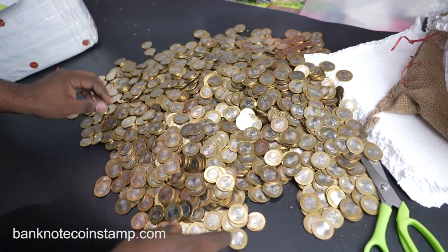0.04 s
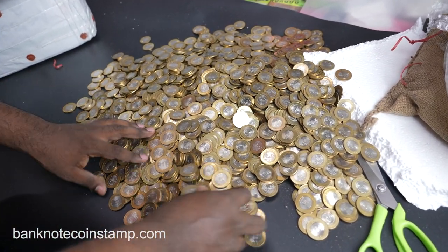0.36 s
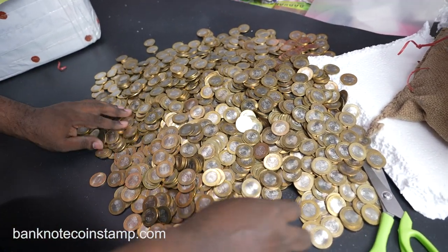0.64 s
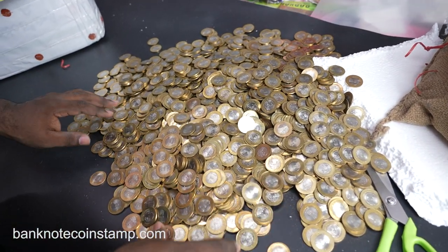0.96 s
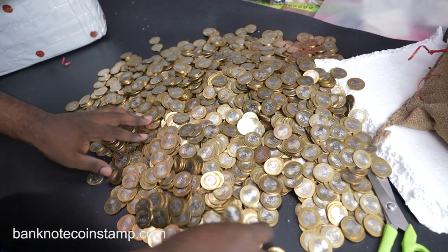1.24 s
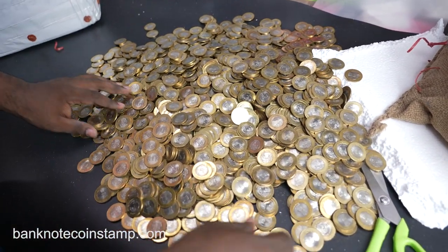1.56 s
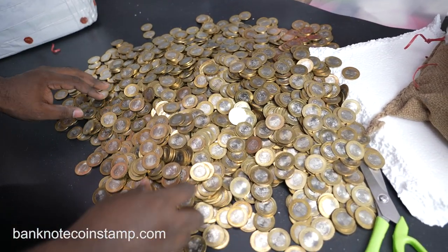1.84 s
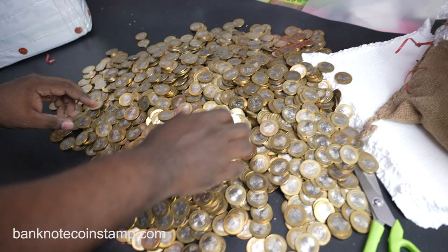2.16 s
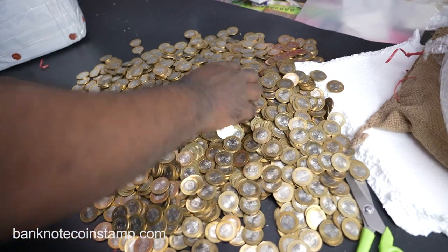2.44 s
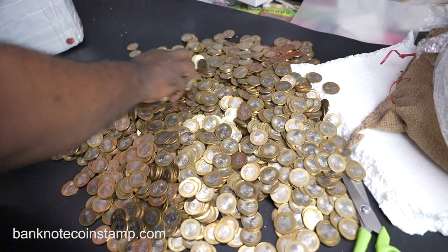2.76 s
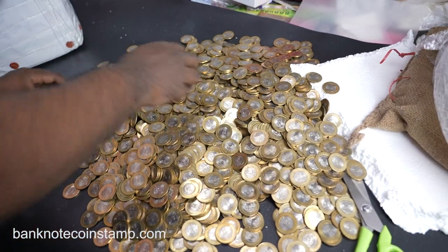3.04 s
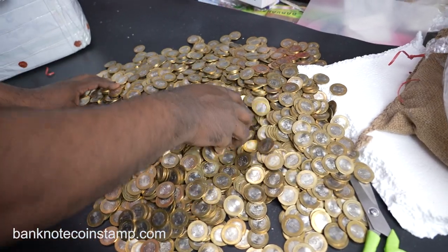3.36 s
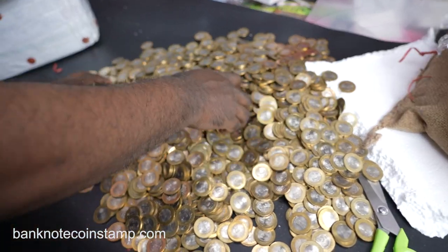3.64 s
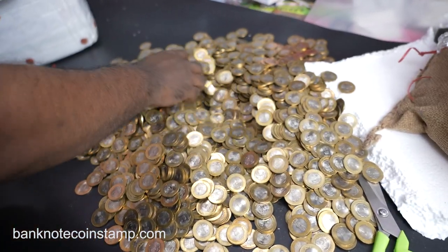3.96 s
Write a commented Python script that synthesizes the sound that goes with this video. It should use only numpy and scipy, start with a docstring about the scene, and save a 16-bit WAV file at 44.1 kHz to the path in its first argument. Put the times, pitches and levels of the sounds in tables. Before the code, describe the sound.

A large pile of metal coins jingles and clatters, stirred by hand in several strokes.

```python
"""In a small room, close by, hands rake through a big heap of coins on a covered table: two light pushes
at the edge, a few stray clinks, then two deep strokes through the middle. Thousands of tiny collisions
click, ring the coins and clatter in the heap and the table; single coins slip and clack on top.
The room echoes briefly and hums faintly."""
import sys
import numpy as np
from scipy import signal
from scipy.fft import rfft, irfft, next_fast_len
from scipy.io import wavfile
from scipy.ndimage import uniform_filter1d, map_coordinates

SR = 44100
rng = np.random.default_rng(int(sys.argv[2]) if len(sys.argv) > 2 else 0)


def wav_record(signal):
    """Record a signal, one row per channel, as 16-bit PCM in the file named by sys.argv[1]."""
    frames = np.transpose(np.atleast_2d(signal))
    bounded = np.clip(frames, -1, 1)
    # unit amplitude maps onto the largest positive 16-bit level
    quanta = np.round(bounded * 32767).astype(np.int16)
    wavfile.write(sys.argv[1], SR, quanta)


N = 176400

# The room's hum. Each row: pitch in Hz, level in dB before the swell is added.
HUM_TONES = [(100, -70.5), (352, -70)]
# The hum swells and ebbs. Each row: time in seconds, gain in dB.
HUM_GAIN = [(.3, -10), (.95, 0.5), (1.33, -2), (1.65, 5), (2.5, -1.5), (4, 3)]
# The room's echo. Each row: frequency in Hz, fade time in seconds (t60, the time to fall by 60 dB).
ECHO_TIMES = [(200, 0.32), (2000, 0.23), (6000, 0.23), (14000, 0.21)]

# Tone colours. Each row: frequency in Hz, relative strength in dB.
AIR_COLOUR = [(15, -66), (25, -29), (64, -25), (90, -6), (176, -9.5), (243, -7.5), (278, -10.5),
              (344, -1.5), (450, -7.5), (529, -10.5), (588, -9), (637, -9.5), (691, -12.5), (1120, -7.5),
              (1240, -12), (3180, -24), (8000, -43), (15000, -65.5)]  # soft room noise
WOOD_COLOUR = [(25, -70), (60, -25), (130, -17.5), (200, 4), (300, -5.5), (400, 2.5), (580, -1.5), (850, 2),
               (1200, -11), (2500, -37)]  # the table's low rattle
CLATTER_COLOUR = [(25, -84), (100, -62), (400, -33.5), (850, -9.5), (1050, 0.5), (1300, -5.5), (1600, 1.5),
                  (2100, -2), (2600, -7.5), (3500, -2.5), (8000, -39)]  # the body of the heap
RASP_COLOUR = [(30, -100), (1200, -25), (2100, -4.5), (2600, -4), (3400, 1), (4200, -7.5), (5500, -6),
               (9000, -45.5)]  # coins sliding
CLICK_COLOUR = [(30, -100), (1500, -34), (3000, -20.5), (4000, 0), (5200, 3), (6500, 3), (8000, 1),
                (9500, -2), (11000, -19), (16000, -47)]  # tiny collisions
FIZZ_COLOUR = [(30, -100), (5000, -31), (8500, 0), (10000, 7), (11500, 1.5), (13000, 4.5), (14300, -3),
               (15000, -8), (16000, -21)]  # their top treble
LANDING_COLOUR = [(30, -90), (200, -62), (1200, -19.5), (2500, -9.5), (4500, -3.5), (7000, -6.5),
                  (9000, -2), (11000, -4), (14000, -15), (16000, -12)]  # the click of one coin landing
TICK_COLOUR = [(30, -100), (3000, -32), (7000, 8.5), (9500, 5), (12500, 2), (14500, -1.5), (16000, -18)]  # the first instant of a hard contact

# Levels in the tables below are relative: the functions add further gains to most layers.
# One list per hand stroke. Each row: time in seconds, then levels in dB of clicks, clatter, fizz, rasp.
HAND_STROKES = [
    [(0.18, -88, -77, -82, -63.5), (0.21, -60, -77, -83, -75), (0.23, -63.5, -73, -69, -64),
     (0.282, -42.5, -54, -55, -48), (0.364, -53, -55, -70, -63), (0.38, -41, -47.5, -52, -44),
     (0.468, -36.5, -40.5, -44, -39), (0.492, -43, -54, -47, -48), (0.5, -40.5, -34, -41.5, -36),
     (0.738, -43, -44.5, -42.5, -41), (0.758, -42, -38.5, -50, -48.5), (0.778, -42, -41, -39.5, -39),
     (0.91, -54.5, -54.5, -59, -71)],
    [(0.99, -71, -73, -66, -79), (1.08, -72, -73, -69, -79.5), (1.094, -50.5, -62.5, -60, -55.5),
     (1.204, -38.5, -43, -39, -38), (1.31, -37.5, -52.5, -39.5, -40), (1.416, -44, -41, -52, -48.5),
     (1.436, -47, -40, -39, -46), (1.576, -44.5, -54, -61, -66), (1.666, -67, -60, -71, -69),
     (1.674, -48, -58, -48, -69), (1.708, -57.5, -62, -59, -66.5), (1.754, -48, -60, -53, -69.5),
     (1.85, -63, -85, -72, -61)],
    [(2.01, -57, -78, -67, -64), (2.014, -77, -70, -69, -73), (2.06, -72, -86, -82, -64),
     (2.072, -48, -53.5, -60, -65), (2.116, -62, -59, -62, -68), (2.136, -49.5, -57, -64, -69),
     (2.148, -56, -60, -61, -75), (2.164, -62, -60, -72.5, -73), (2.23, -57, -60, -70, -77),
     (2.25, -79, -74, -77, -85), (2.26, -54.5, -58, -74, -77), (2.302, -86, -80, -98, -98)],
    [(2.5, -90, -58, -109, -85), (2.532, -44, -54.5, -58.5, -63), (2.592, -35, -44.5, -43, -49),
     (2.606, -36, -42.5, -44.5, -47.5), (2.778, -25.5, -34, -28, -37.5), (2.896, -28, -27.5, -27, -39),
     (2.962, -30, -31.5, -35.5, -36), (3.004, -26, -31.5, -28, -40), (3.09, -34.5, -49, -38, -42.5),
     (3.12, -33, -38, -35, -41), (3.174, -36, -66, -47, -53), (3.19, -36, -43, -37, -47),
     (3.235, -50, -68, -60, -56)],
    [(3.27, -33.5, -54, -59, -37.5), (3.314, -45, -54, -49, -66), (3.342, -22.5, -30, -33, -35.5),
     (3.388, -28, -29, -31, -28.5), (3.522, -34, -50.5, -43.5, -44.5), (3.558, -38, -40, -48, -44),
     (3.642, -27.5, -31.5, -37, -39.5), (3.71, -30, -28, -37.5, -42), (3.786, -19.5, -25, -28, -34),
     (3.812, -27, -29, -35, -36.5), (3.932, -25.5, -30, -32, -36), (3.98, -22.5, -24, -30, -36),
     (4.0, -26.5, -48, -29, -43)],
]
# Pressure on the table. Each row: time in seconds, level of its rattle in dB.
TABLE_RATTLE = [(0, -92), (.3, -66.5), (.65, -58), (1.0, -70), (1.3, -60.5), (1.7, -63), (2.52, -62.5),
                (2.64, -56), (2.77, -46.5), (2.9, -52.5), (3.05, -51.5), (3.22, -61), (3.31, -57.5),
                (3.37, -48.5), (3.53, -57.5), (3.75, -44), (4, -54.5)]
# The gap between hand and heap. Each row: time in seconds, pitch in Hz, dB added to the clatter level.
HAND_HOLLOW = [(.3, 1720, 4.5), (.52, 1700, -10.5), (.66, 1450, 1), (.82, 1510, 5), (.95, 1370, -1.5),
               (1.12, 1950, 7.5), (1.22, 1760, 4.5), (1.32, 1810, 2.5), (1.5, 1680, -1.5),
               (2.6, 1040, -9.5), (2.8, 1140, -4.5), (2.92, 1390, -8.5), (3.1, 1634, 2), (3.35, 2125, 0.5),
               (3.65, 1613, -2), (3.85, 1550, -6), (4, 1326, -4)]
# Coins skid flat over each other. Each row: start and length in seconds, pitch in Hz, level in dB.
COIN_SKIDS = [(0.72, 0.14, 1440, -51), (1.195, 0.061, 1850, -45), (1.74, 0.068, 3400, -51.5),
              (2.062, 0.054, 6700, -49), (2.254, 0.014, 6770, -49), (2.523, 0.37, 6240, -44)]
# The ways a coin bends and rings (its modes). Each row: pitch in Hz, level in dB,
# pitch spread from coin to coin as a fraction, fade time in seconds.
COIN_MODES = [(4880, -8.5, 0.036, 0.013), (8760, -1, 0.022, 0.018), (14050, -10, 0.014, .03)]
# Coins that lie free and ring on. Each row: start in seconds, main pitch in Hz, its level in dB,
# its fade time in seconds, level of the high ring in dB, its fade time in seconds.
SINGING_COINS = [(0.956, 8800, -43, 0.39, -65, .1), (1.922, 8670, -43, 0.6, -20, 0.12)]
# Single coins slip and land. Each row: start in seconds, click level in dB, knock level in dB,
# main pitch in Hz, its level in dB, level of the high ring in dB, fade time of both in seconds.
LANDINGS = [(0.3293, -30.5, -31.5, 8800, -41, -57, 0.045), (0.4036, -30, -42, 9080, -55, -46, 0.042),
            (0.4244, -21.5, -37, 8750, -48, -44, 0.042), (0.4582, -21.5, -31, 8550, -45, -32, 0.042),
            (0.5048, -32, -34, 8620, -55, -43.5, 0.042), (0.6241, -17, -23, 8650, -48, -33.5, 0.042),
            (0.7051, -24, -36, 8800, -46, -42, 0.046), (0.769, -21, -33, 8950, -43, -43, 0.038),
            (0.92, -24, -46, 9100, -39, -55.5, 0.04), (0.9547, -32.5, -40.5, 8920, -33, -53, 0.04),
            (1.095, -33, -57, 9100, -51, -59.5, 0.042), (1.1807, -19, -48, 8600, -40, -44, 0.042),
            (1.2528, -16.5, -45, 8540, -26.5, -36, 0.042), (1.2814, -28.5, -46, 8520, -35, -43, 0.042),
            (1.3351, -15, -32.5, 8840, -28, -35, 0.042), (1.4425, -21, -47, 9000, -25, -50.5, 0.047),
            (1.4772, -16.5, -34, 8760, -25, -38, 0.042), (1.5273, -27.5, -48, 8850, -25.5, -37, 0.05),
            (1.545, -25.5, -43, 8800, -39, -38, 0.056), (1.576, -22, -35, 8650, -34.5, -50, 0.042),
            (1.674, -27, -55.5, 8810, -28, -42, 0.05), (1.688, -29.5, -54.5, 9530, -32, -56, 0.04),
            (1.731, -30.5, -42, 8970, -37.5, -61.5, 0.039), (1.7728, -24.5, -58, 8930, -39, -49, 0.047),
            (1.8598, -34.5, -62, 8900, -43, -63, 0.042), (1.9105, -23, -34, 8750, -30, -37.5, 0.052),
            (1.9184, -15.5, -30.5, 8770, -23, -38, 0.025), (1.921, -19, -33, 9600, -22, -46, 0.033),
            (1.9513, -21, -45.5, 9150, -47, -52, 0.03), (2.0692, -33, -53, 8750, -51, -61, 0.042),
            (2.082, -28.5, -62, 8440, -56, -58, 0.042), (2.2095, -42, -51, 8950, -50, -75, 0.042),
            (2.2604, -41, -54, 8780, -52, -70, 0.042), (2.528, -35.5, -58, 8970, -57, -66, 0.042),
            (2.629, -19.5, -34, 8900, -41, -46, 0.042), (2.707, -14, -47, 8900, -31, -36, 0.038),
            (2.758, -16, -37, 8750, -27, -40, 0.042), (2.9165, -13, -43, 8770, -9, -39, 0.045),
            (2.9296, -24, -32, 8760, -7, -39, 0.018), (3.0031, -11.5, -35, 8500, -9, -35, 0.035),
            (3.1098, -21, -44, 8900, -19, -43, 0.042), (3.13, -22, -35, 8700, -22, -43, 0.046),
            (3.2414, -11, -28.5, 8890, -40, -42.5, 0.038), (3.2549, -20, -38, 9120, -36, -48, 0.033),
            (3.3306, -11, -46, 9070, -33, -40, 0.042), (3.3425, -15, -25, 8950, -38, -39.5, 0.042),
            (3.3905, -10, -16, 8750, -35, -35, 0.042), (3.4079, -20, -23, 8800, -31, -30, 0.042),
            (3.4318, -12.5, -21.5, 8880, -32, -35, 0.042), (3.5094, -12.5, -33, 8860, -38, -43, 0.042),
            (3.5895, -15.5, -46, 8900, -36, -48, 0.042), (3.6192, -14.5, -28, 9060, -24, -43, 0.039),
            (3.638, -13, -22, 8840, -20.5, -41.5, 0.042), (3.758, -8, -17, 8730, -21, -41, 0.042),
            (3.7804, -16, -28, 8500, -36, -38.5, 0.042), (3.8388, -10.5, -19, 8600, -10.5, -33, 0.036),
            (3.891, -10, -34, 8740, -28, -29.5, 0.06), (3.9676, -6, -18.5, 8960, -35, -40, 0.042)]

CONTACTS_PER_S, FULL_PUSH_DB = 6000, -31.5  # the collision rate under a push of this level
HIGH_MODE_RATIO = 1.59  # a coin's high ring over its main pitch
TIME = np.arange(N) / SR


def amp(db):
    """Turn decibels into a gain."""
    return 10 ** (np.asarray(db) / 20)


def unit(x):
    """Scale a signal to an average power of 1."""
    return x / np.sqrt(np.mean(x ** 2) + 1e-20)


def along(points, hz):
    """Read between (Hz, value) points on a log frequency axis."""
    freqs, values = np.transpose(points)
    return np.interp(np.log(hz + 1), np.log(freqs + 1), values)


def curve(rows, column=1):
    """Stretch one column of a timed table to one value per sample."""
    rows = np.asarray(rows)
    return np.interp(TIME, rows[:, 0], rows[:, column])


def wobble(per_s):
    """A smooth curve through per_s random points a second."""
    return map_coordinates(rng.standard_normal(4096), [TIME * per_s], mode="wrap")


def coloured(x, colour):
    """Give a sound a tone colour; white noise keeps its power."""
    size = 2 * next_fast_len(N // 2 + SR // 8)
    gain = unit(amp(along(colour, np.fft.rfftfreq(size, 1 / SR))))
    cepstrum = irfft(np.log(gain), size)
    cepstrum[1:size // 2] *= 2  # folded so the filter rings only after a hit, never before
    cepstrum[size // 2 + 1:] = 0
    return irfft(rfft(x, size) * np.exp(rfft(cepstrum)), size)[:N]


def resonate(x, hz, t60):
    """Ring at one pitch; white noise keeps its power."""
    r = amp(-60 / (t60 * SR))
    feedback = [1, -2 * r * np.cos(2 * np.pi * hz / SR), r * r]
    return signal.lfilter(np.sqrt((1 - r * r) / 2) * np.array([1, 0, -1]), feedback, x)


def band(x, hz, t60):
    """Resonate twice, leaving a band with steeper sides."""
    return resonate(resonate(x, hz, t60), hz, t60)


def patchy(x, depth_db=1):
    """Vary the gain at random over time and pitch, so every collision has its own colour."""
    spectrum = signal.stft(x, nperseg=256)[2]
    patches = uniform_filter1d(rng.standard_normal(spectrum.shape), 6, axis=0)
    patches = uniform_filter1d(patches, 5, axis=1)
    gain = amp(depth_db * unit(patches))
    return signal.istft(spectrum * unit(gain), nperseg=256)[1][:N]


def contacts(per_s, spread_db=5.5):
    """Random collisions of uneven size, evened out to a steady power."""
    hits = (rng.random(N) < per_s / SR) * rng.choice([-1, 1], N)
    hits = hits * amp(spread_db * np.minimum(rng.standard_normal(N), 2))
    power = uniform_filter1d(uniform_filter1d(hits * hits, size=1500), size=1500)
    return hits / np.sqrt(np.abs(power) + 1e-5)


def background(air_db=-57):
    """Soft room air with a hum that wavers in level and pitch."""
    hum = np.zeros(N)
    for hz, db in HUM_TONES:
        peak = np.sqrt(2) * amp(db + 2.5 * wobble(6))
        hum += peak * np.sin(2 * np.pi * hz * TIME + 0.66 * wobble(7.6))
    air = amp(air_db) * unit(coloured(rng.standard_normal(N), AIR_COLOUR))
    return air + amp(curve(HUM_GAIN)) * hum


def room(x, tail_db=-5, near_db=-10):
    """Near surfaces scatter the sound at once, then the echo follows; both change as the coins move."""
    def even(rows):
        return rows / np.linalg.norm(rows, axis=1, keepdims=True)

    hop = round(0.02 * SR)  # each 20 ms piece gets its own random echo
    pieces = np.pad(x, (0, -N % hop)).reshape(-1, hop)
    hz, t, noise = signal.stft(rng.standard_normal((len(pieces), SR // 3)), SR, nperseg=256)
    tail = signal.istft(noise * amp(-60 * t / along(ECHO_TIMES, hz)[:, None]), SR, nperseg=256)[1]
    t = np.arange(tail.shape[1]) / SR
    tail *= 1 - np.exp(-t / 0.012)
    near = rng.standard_normal(tail.shape) * amp(-60 * t / 0.015) * (t > 0.0005)
    direct = t == 0
    echoes = even(direct + amp(tail_db) * even(tail) + amp(near_db) * even(near))
    out = np.zeros(N + SR)
    for k, echoed in enumerate(signal.fftconvolve(pieces, echoes, axes=1)):
        out[k * hop:][:len(echoed)] += echoed
    return out[:N]


def rub(peak_s=2.75, half_width_s=0.081, hz=445, db=-43):
    """A short low groan as the hand shoves coins along the table."""
    swell = np.exp(-((TIME - peak_s) / half_width_s) ** 2)
    return amp(db) * swell * unit(band(contacts(CONTACTS_PER_S), hz, t60=0.018))


def skids(width_hz=1100, rise_s=0.0069):
    """A coin sliding on another gives a short, narrow hiss of tiny slips."""
    t60 = np.log(1000) / (np.pi * width_hz)
    out = np.zeros(N)
    for start, length, hz, db in COIN_SKIDS:
        rise = np.clip((TIME - start) / rise_s, 0, 1)
        fall = np.clip(2 * (start + length - TIME) / length, 0, 1)
        out += amp(db) * rise * fall * unit(band(contacts(CONTACTS_PER_S), hz, t60))
    return out


def coin_ring(t, hz, db, t60, rough=0.55, chatter_per_s=350):
    """One fading tone, roughened as the coin buzzes against its neighbours."""
    points = np.arange(200) / chatter_per_s
    buzz = [rough * np.interp(t, points, row) for row in rng.standard_normal((2, len(points)))]
    phase = 2 * np.pi * hz * t
    wave = (np.sqrt(1 - rough ** 2) + buzz[0]) * np.sin(phase) + buzz[1] * np.cos(phase)
    return amp(db - 60 * t / t60) * wave


def singing_coins(beat_hz=70, twin_db=-12.5, rough=0.45):
    """A coin lying loose rings on at two pitches, each a close pair of tones that beats."""
    t = np.arange(SR // 2) / SR
    rise = 1 - np.exp(-t / 0.002)
    out = np.zeros(N + SR)
    for start, main_hz, main_db, main_t60, high_db, high_t60 in SINGING_COINS:
        modes = (main_hz, main_db, main_t60), (main_hz * HIGH_MODE_RATIO, high_db, high_t60)
        for hz, db, t60 in modes:
            ring = coin_ring(t, hz, db, t60, rough)
            twin = coin_ring(t, hz - beat_hz, db + twin_db, t60, rough)
            out[round(start * SR):][:len(t)] += rise * (ring + twin)
    return out[:N]


def stroke_db(column, fade_in_s=0.28, fade_out_s=0.34):
    """One level in dB through all the hand's strokes, fading in before each and out after it."""
    level = 1e-6
    for rows in HAND_STROKES:
        before = (rows[0][0] - TIME) / fade_in_s
        after = (TIME - rows[-1][0]) / fade_out_s
        fade_db = -60 * np.maximum(0, np.maximum(before, after))
        level = np.maximum(level, amp(curve(rows, column) + fade_db))
    return 20 * np.log10(level)


def jingle(coins=80):
    """Loose coins in the moving heap ring briefly, each with its own pitch and fade time."""
    hits = contacts(per_s=1900) * amp(stroke_db(column=3))  # follows the fizz level
    struck_coin = rng.integers(coins, size=N)
    out = np.zeros(N)
    for coin in range(coins):
        blows = hits * (struck_coin == coin)
        for hz, db, spread, t60 in COIN_MODES:
            detune, stretch = rng.standard_normal(2)
            out += amp(db) * resonate(blows, hz * (1 + spread * detune), t60 * 2 ** (0.43 * stretch))
    return out


def hollow(x, width_hz=660):
    """The gap under the hand resonates, its pitch moving as the hand cups and flattens."""
    pitches = np.geomspace(900, 2200, 8)
    position = np.interp(curve(HAND_HOLLOW), pitches, np.arange(len(pitches)))
    t60 = np.log(1000) / (np.pi * width_hz)
    out = np.zeros(N)
    for k, hz in enumerate(pitches):
        share = np.maximum(0, 1 - abs(position - k))  # blend the two nearest bands
        out += share * band(x, hz, t60)
    return unit(out)


def heap(crowding_per_db=0.04, surge_db=1.3):
    """A harder push makes more and louder collisions, which click, rasp and shake heap and table."""
    push_db, clatter_db, fizz_db, rasp_db = (stroke_db(column) for column in (1, 2, 3, 4))
    per_s = CONTACTS_PER_S * 10 ** (crowding_per_db * (push_db - FULL_PUSH_DB))
    surge = amp(surge_db * wobble(70))
    shared = contacts(per_s)

    def hits():  # half shared by all layers, half new
        return surge * (shared * rng.choice([-1, 1], N) + contacts(per_s)) / np.sqrt(2)

    clicks = amp(push_db - 1) * coloured(hits(), CLICK_COLOUR)
    fizz = amp(fizz_db - 1) * coloured(hits(), FIZZ_COLOUR)
    rasp = amp(rasp_db + 0.5) * coloured(hits(), RASP_COLOUR)
    cupped = amp(clatter_db + curve(HAND_HOLLOW, column=2) - 1.5) * hollow(hits())
    clatter = amp(clatter_db - 8) * coloured(hits(), CLATTER_COLOUR)
    coins = patchy(clicks + fizz + rasp + cupped + clatter)
    table = amp(curve(TABLE_RATTLE) + 1) * coloured(hits(), WOOD_COLOUR)
    return coins + table


def clinks(bounces=3, bounce_s=0.005, loss_db=5, rise_s=0.0009, tick_t60=0.0042, click_t60=0.03):
    """A coin lands with a tick and rings; each bounce clicks, knocks the heap and rings a neighbour."""
    t = np.arange(SR // 4) / SR
    ticks, clicks, knocks, rings = np.zeros((4, N + SR))
    ring_rise = 1 - np.exp(-t / (2 * rise_s))
    click_shape = (1 - np.exp(-t / rise_s)) * amp(-60 * t / click_t60)
    for start, click_db, knock_db, main_hz, main_db, high_db, t60 in LANDINGS:
        at = round(start * SR)
        modes = (main_hz, main_db + 3), (main_hz * HIGH_MODE_RATIO, high_db + 6)
        rings[at:][:len(t)] += ring_rise * sum(coin_ring(t, hz, db, t60) for hz, db in modes)
        ticks[at:][:len(t)] += amp(click_db - 8 - 60 * t / tick_t60) * rng.standard_normal(len(t))
        for k in range(bounces):
            at = round((start + k * bounce_s * rng.uniform(0.78, 1.3)) * SR)
            click, knock = amp(-loss_db * k) * click_shape * rng.standard_normal((2, len(t)))
            clicks[at:][:len(t)] += amp(click_db - 10) * click
            knocks[at:][:len(t)] += amp(knock_db - 2.5) * knock
            for hz, db in modes:
                neighbour_hz = hz * (1 + 0.018 * rng.uniform(-2, 2.1))
                neighbour_db = db - 7.5 - loss_db * k / 2
                rings[at:][:len(t)] += ring_rise * coin_ring(t, neighbour_hz, neighbour_db, t60=0.032)
    clacks = patchy(coloured(clicks[:N], LANDING_COLOUR) + coloured(knocks[:N], CLATTER_COLOUR))
    return clacks + coloured(ticks[:N], TICK_COLOUR) + rings[:N]


def scene(low_cut_hz=60):
    """All the coins in their room, with no deep bass, over the air and hum, in one channel."""
    coins = room(heap() + rub() + skids() + jingle() + clinks()) + singing_coins()
    low_cut = signal.butter(2, low_cut_hz, "highpass", fs=SR, output="sos")
    return (signal.sosfilt(low_cut, coins) + background())[None]


def record(dry, top_hz=15800):
    """Cut away the very highest treble."""
    size = next_fast_len(N + SR // 4)
    kept = np.fft.rfftfreq(size, 1 / SR) < top_hz
    return irfft(rfft(dry, size) * kept, size)[..., :N]


dry = scene()
out = record(dry)
wav_record(out)
```